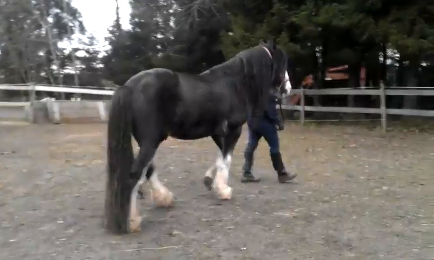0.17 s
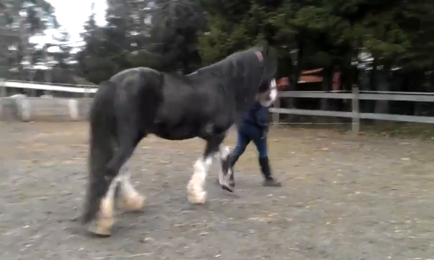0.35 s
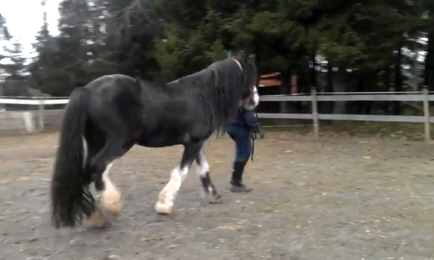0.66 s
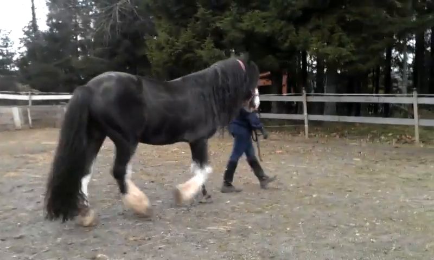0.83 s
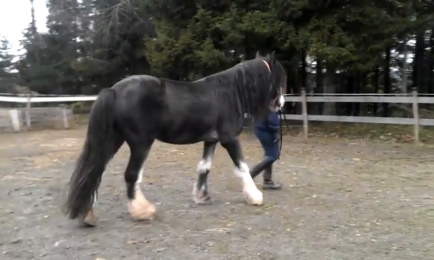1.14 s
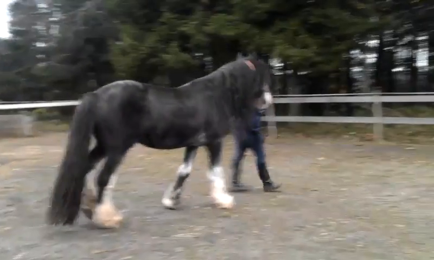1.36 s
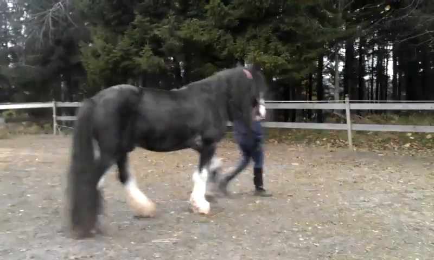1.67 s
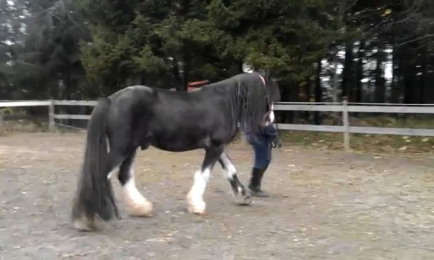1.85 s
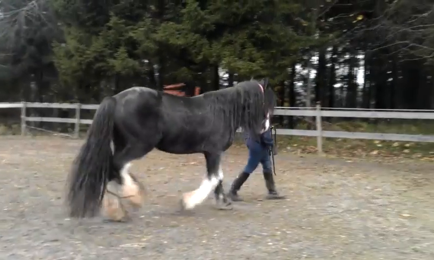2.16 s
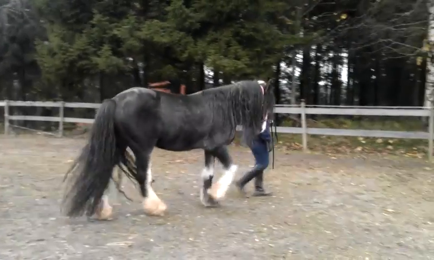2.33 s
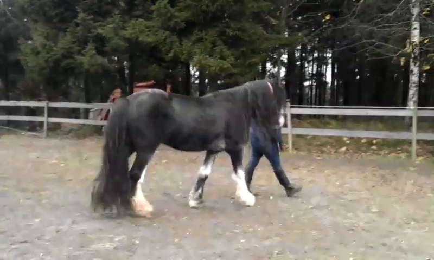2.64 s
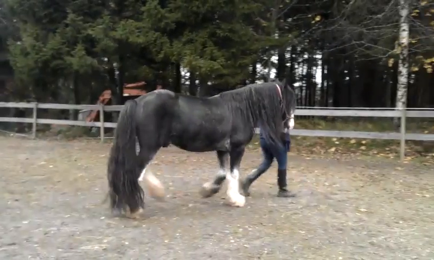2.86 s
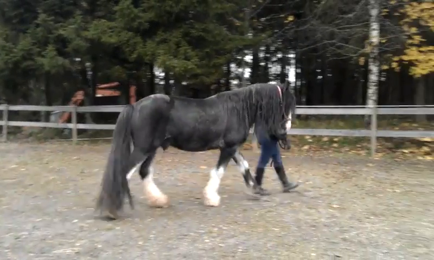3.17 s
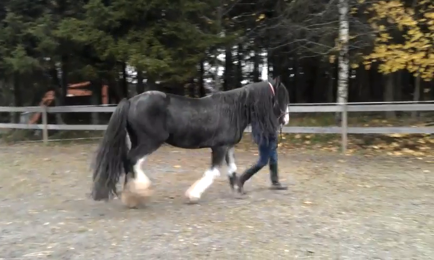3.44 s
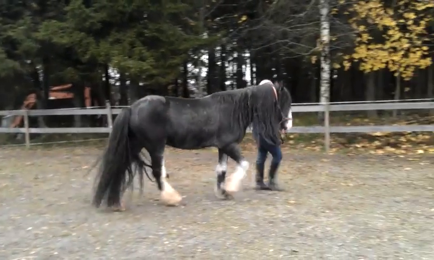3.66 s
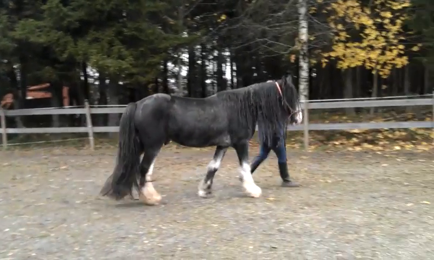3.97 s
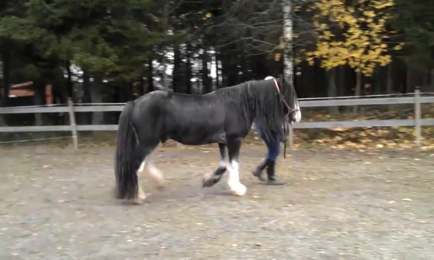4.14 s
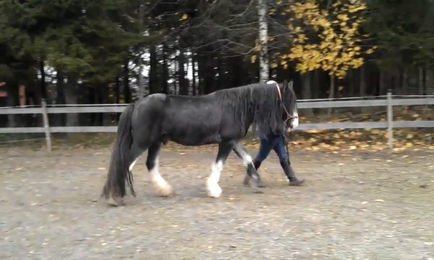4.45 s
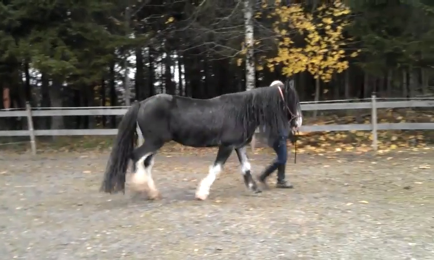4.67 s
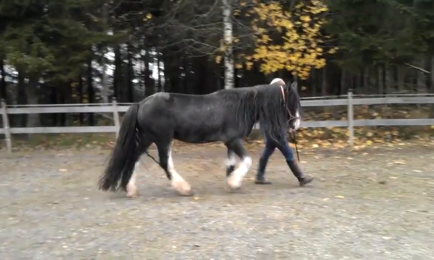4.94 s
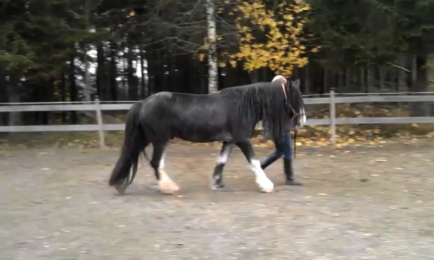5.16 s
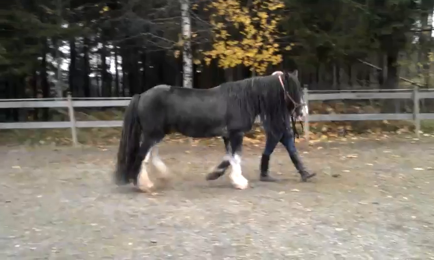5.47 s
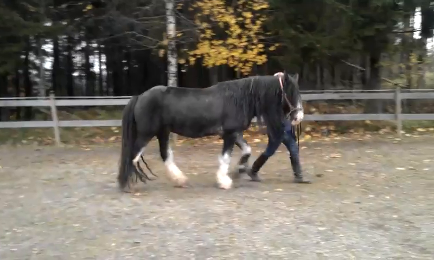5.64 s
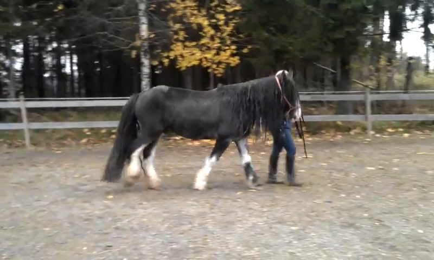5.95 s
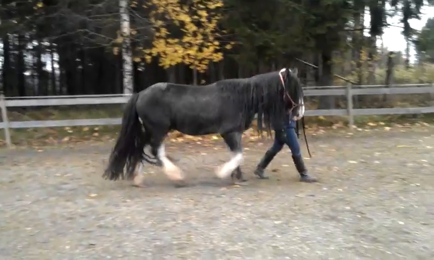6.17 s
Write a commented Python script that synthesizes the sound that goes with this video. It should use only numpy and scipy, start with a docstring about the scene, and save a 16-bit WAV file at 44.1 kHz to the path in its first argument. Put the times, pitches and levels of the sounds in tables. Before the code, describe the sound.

Boots scrape gravel close by, then a heavy horse walks past, hooves crunching with irregular boot steps and small stones snapping in a quiet outdoor paddock.

```python
"""At first a pair of boots scrapes twice over gravel close to the microphone, and single stones snap.
A heavy horse is led past at a walk: each hoof bites in heel first, then crushes the bed over a dull thud.
Boot steps and dragging toes grind between the hoof falls, with more snapping stones and a few dull knocks.
Gravel is made of thousands of tiny rings, pressed by each foot and coloured by grit, big stones and sand.
A faint outdoor hush of filtered noise and stray grains lies behind it all."""
import sys
import numpy as np
from scipy import signal
from scipy.fft import rfft, irfft, next_fast_len
from scipy.io import wavfile

SR = 44100
rng = np.random.default_rng(int(sys.argv[2]) if len(sys.argv) > 2 else 0)


def to_wav(sig):
    """Store sig (one row per channel, or 1-D mono) as 16-bit WAV at the path in sys.argv[1].

    Samples outside -1..1 are clipped; the rate is SR.
    """
    pcm = np.clip(np.atleast_2d(sig), -1, 1) * 32767
    pcm = np.round(pcm).astype(np.int16)
    wavfile.write(sys.argv[1], SR, pcm.T)  # frames by channels


N = 277866

# Hoof falls. Each row: touch in seconds, full weight in seconds, crush level in dB before colour and trim,
# heel level in dB re the crush before its bite, big stones in dB before the shared lift.
HOOF_FALLS = [ (0.194, 0.229, -19.5, -2.5, -2.5), (0.954, 0.98, -19.5, -11.5, -5.5),
              (1.221, 1.255, -24, -9.5, 4), (1.727, 1.779, -22.5, -7, -5.5),
              (1.973, 2.005, -28.5, -10, -4.5), (2.393, 2.418, -20.5, -10.5, -1.5),
              (2.615, 2.641, -30.5, -5.5, -4), (3.051, 3.098, -19.5, -11, -8.5),
              (3.325, 3.35, -29, -19, -6), (3.686, 3.721, -21, -15, -5), (3.907, 3.935, -25, -10, -3),
              (4.332, 4.381, -22.5, -14.5, -4), (5.021, 5.057, -22.5, -13, -5.5),
              (5.206, 5.232, -24, -15, -7.5), (5.665, 5.714, -23.5, -16, -0.5),
              (5.92, 5.939, -29, -26, -3.5)]


def hooves():
    """The heel bites in, the weight crushes the bed over a ground thud, and loose stones settle."""
    # the crush spreads longer when the hoof rolls slowly; a shape of 2 is a bell, less is more pointed
    crush_s, crush_per_roll, crush_shape = .006, .13, 1.61
    bite_db, settle_db, settle_decay_s = 3.5, -22, .078
    sand_db, damped_pitch, trim_db = -9, .92, .5
    # thud level is re the untrimmed crush, at the usual roll time; its swell starts this long before full weight
    thud_db, thud_hz, thud_lead_s = -40, 203, .041
    usual_roll_s, thud_db_per_halving = .035, 5.5

    out = np.zeros(N)
    run = grains(per_s=20000, spread_db=2.0, cluster_db=.2)
    t = np.arange(SR // 4) / SR
    touch = np.minimum(t / .004, 1)
    bite = np.exp(-t / .008)
    for start, load, db, heel_db, coarse_db in HOOF_FALLS:
        late = start + t - load
        roll_s = load - start
        crush = np.exp(-.5 * np.abs(late / (crush_s + crush_per_roll * roll_s)) ** crush_shape)
        # the heel hands over to the crush around full weight
        handover = np.sqrt(.5 - .5 * np.tanh(late / .008))
        heel = undb(heel_db + bite_db * bite) * handover
        settle = undb(settle_db) * np.exp(-np.abs(late) / settle_decay_s)
        force = touch * np.sqrt(crush ** 2 + heel ** 2 + settle ** 2)
        gravel = crunch(run, start, force, coarse_db, damped_pitch * stone_pitch(coarse_db), sand_db)
        add(out, start, undb(db + trim_db) * gravel)
        # a quicker roll onto the hoof thuds harder
        thud_level_db = db + thud_db + thud_db_per_halving * np.log2(usual_roll_s / roll_s)
        thud = thump(thud_hz, half_s=.012, steep_db=11)
        add(out, load - thud_lead_s, undb(thud_level_db) * thud)
    return out


# Boot steps and hoof drags. Each row: start in seconds, end in seconds, level halfway in dB before colour,
# swell from start to end in dB, big stones in dB before the shared lift.
STEPS_AND_DRAGS = [(0.907, 0.953, -44.5, 6, -3.5), (1.007, 1.093, -29, 2.5, -11),
                   (1.144, 1.216, -45, -5, -8), (1.28, 1.315, -40.5, -12, 5), (1.353, 1.46, -37, 1, .5),
                   (1.561, 1.705, -31.5, 1, -7.5), (1.838, 1.962, -45.5, -3.5, -10),
                   (2.124, 2.163, -27, 4, -7.5), (2.224, 2.295, -34, 4.5, -13.5),
                   (2.776, 2.896, -32, -5, -27), (3.22, 3.292, -37.5, -6.5, -12.5),
                   (3.386, 3.486, -32.5, 8, -6), (3.794, 3.831, -44, 4, -10), (3.974, 4.062, -32, -2, -6.5),
                   (4.41, 4.451, -42.5, 3, -2), (4.501, 4.57, -37, 6, -5.5), (4.599, 4.63, -34, 9.5, -12),
                   (4.748, 4.76, -36, 4.5, -10), (4.929, 4.975, -46.5, -6.5, 3.5),
                   (5.089, 5.188, -38, -12.5, -11), (5.556, 5.574, -38.5, 6.5, -13),
                   (5.632, 5.683, -32.5, 15.5, -3), (6.032, 6.074, -37.5, 12, -16),
                   (6.152, 6.201, -42, 13, -11), (6.212, 6.3, -30.5, -3.5, -4.5)]


def scuffs():
    """A sole rolls or a toe drags: fewer stones move, in uneven pushes, and trickle on a little."""
    rise_s, fall_s = .013, .019
    settle_db, settle_s = -20, .031
    out = np.zeros(N)
    run = rubbing(spread_db=2.5, cluster_db=.8, push_db=1.6, pebble_db=-18.5)
    for start, end, db, swell_db, coarse_db in STEPS_AND_DRAGS:
        first = max(start - 4 * rise_s, 0)
        t = first + np.arange(int((end - first + 4 * settle_s) * SR)) / SR
        progress = np.clip((t - start) / max(end - start, rise_s), 0, 1)
        rise = np.exp(-np.maximum(start - t, 0) / rise_s)
        after = np.maximum(t - end, 0)
        trickle = undb(settle_db) * np.exp(-after / settle_s)
        release = np.maximum(np.exp(-after / fall_s), trickle)
        force = rise * release * undb(db + swell_db * (progress - .5))
        add(out, first, crunch(run, first, force, coarse_db, stone_pitch(coarse_db), sand_db=-13))
    return out


# The two long scrapes of the near boots, a list of points for each. Each row: time in seconds,
# grit level in dB before colour, big stone level in dB before filter and lift.
NEAR_SCRAPES = [
    [(0.0, -26, -20), (0.032, -30, -17), (0.038, -27, -16), (0.08, -36, -22), (0.102, -29, -28),
     (0.132, -29, -30), (0.142, -31, -38), (0.152, -27.5, -42), (0.164, -41, -33), (0.19, -43, -39)],
    [(0.375, -37, -50), (0.403, -21.5, -24), (0.421, -34.5, -36.5), (0.473, -29.5, -59),
     (0.505, -24.5, -22.5), (0.639, -31.5, -24.5), (0.657, -31, -36.5), (0.703, -38, -39),
     (0.721, -31.5, -30.5), (0.759, -27, -34.5), (0.9, -53, -53)],
]
# What lies under the sole in each scrape. Each row: pitch of the big stones in Hz,
# fine sand in dB re the plain gravel colour at 8.5 kHz.
UNDER_SOLE = [(2400, -18), (1850, -12.5)]


def boots():
    """Close by, a sole slides over grit and grinds the big stones as the weight comes onto it."""
    big_lift_db, edge_s = 6, .015
    out = np.zeros(N)
    small = rubbing(spread_db=2.5, cluster_db=.7, push_db=1.1, pebble_db=-15.5)
    large = rubbing(spread_db=2.5, cluster_db=.7, push_db=1.1, pebble_db=-15.5)
    for scrape, (big_hz, sand_db) in zip(NEAR_SCRAPES, UNDER_SOLE):
        when, grit_db, big_db = np.transpose(scrape)
        first = max(when[0] - 4 * edge_s, 0)
        i = np.arange(int(first * SR), int((when[-1] + 4 * edge_s) * SR))
        t = i / SR
        # full contact during the scrape, soft edges outside it
        contact = np.exp(-np.abs(t - np.clip(t, when[0], when[-1])) / edge_s)
        grit = contact * undb(np.interp(t, when, grit_db))
        big = contact * undb(np.interp(t, when, big_db))
        add(out, first, crunch(small, first, grit, coarse_db=-4, coarse_hz=3300, sand_db=sand_db))
        ground = shape(large[i] * big, lambda hz: hump(hz, big_hz, steep_db=6.0))
        add(out, first, undb(big_lift_db) * ground)
    return out


# The loudest stones that snap under a foot. Each row: time in seconds, peak in dB before trim, pitch in Hz.
SNAPPING_STONES = [(0.0405, -5, 1800), (0.0473, -7, 2500), (0.0735, -9, 2450), (0.1512, -9, 3900),
                   (0.3564, -18, 2300), (0.3643, -13, 2550), (0.4771, -11, 5600), (0.5192, -8, 3300),
                   (0.7256, -13, 1400), (1.2562, -8, 2000), (1.5605, -14, 4600), (1.7169, -9, 4700),
                   (1.7367, -14, 4600), (2.2871, -16, 4700), (2.8889, -15, 5200), (4.21, -28, 1700),
                   (4.5485, -19, 1650), (5.047, -11, 5600), (5.678, -11, 1700), (6.2208, -10, 5800)]


def stones():
    """A pinched stone springs free: a ring of a cycle or two and a tiny spray of grit."""
    spray_db, trim_db = -9, -1
    out = np.zeros(N)
    t = np.arange(SR // 100) / SR
    colour = [(60, -65), (300, -30), (1200, 0), (6000, 0), (14000, -16)]  # (Hz, dB)
    for start, db, hz in SNAPPING_STONES:
        ring = np.sin(2 * np.pi * hz * t) * np.exp(-t * hz / 1.4)
        spray = undb(spray_db) * rng.standard_normal(len(t)) * np.exp(-t / .0006)
        # silence in front leaves room for the filter to spread
        padded = np.pad(ring + spray, (len(t), 0))
        snap = shape(padded, lambda f: curve(colour, f))
        add(out, start - len(t) / SR, undb(db + trim_db) * snap / np.abs(snap).max())
    return out


# Dull knocks of a sole or hoof on packed ground. Each row: time of the swell's top in seconds, level in dB,
# pitch in Hz, half length of the swell in seconds.
GROUND_KNOCKS = [(0.506, -35, 835, 0.0054), (0.546, -37, 610, .017), (0.628, -31.5, 1450, .012),
                 (2.096, -42, 630, .005), (2.412, -40, 766, .014), (3.432, -34.5, 1200, 0.0042),
                 (4.553, -33, 1220, .0048)]


def knocks():
    """Packed ground answers a firm step with a dull knock."""
    out = np.zeros(N)
    for when, db, hz, half_s in GROUND_KNOCKS:
        add(out, when - 3 * half_s, undb(db) * thump(hz, half_s, steep_db=7))
    return out


# Colour of the outdoor air. Each row: frequency in Hz, gain on white noise in dB.
AIR_COLOUR = [(30, -81), (80, -68), (120, -78), (180, -56), (280, -46), (600, -43), (1200, -43),
              (2500, -49), (5000, -48), (8700, -56), (12000, -61.5), (15500, -64)]


def hush():
    """Soft outdoor air as filtered noise, and the odd grain shifting under standing feet."""
    air = shape(rng.standard_normal(N), lambda hz: curve(AIR_COLOUR, hz))
    air = air * undb(.7 * walk(9))
    trickle = grains(per_s=500, spread_db=3.8, cluster_db=1.5) * undb(2 * walk(12))
    force = np.full(N, undb(-60))
    return air + crunch(trickle, 0, force, coarse_db=-2.0, coarse_hz=1760, sand_db=-12.0)


# Colour of crushed gravel. Each row: frequency in Hz, gain in dB.
GRAVEL_COLOUR = [(60, -58), (250, -32.5), (800, -13), (1500, -15.5), (2500, -0.5), (3400, -0.5), (4500, 8),
                 (5700, 7.5), (8700, 9), (10500, 4.5), (12500, 3), (15500, -8)]


def crunch(run, start_s, force, coarse_db, coarse_hz, sand_db):
    """Grains played by a foot's force; big stones add a broad ring in the middle, sand sets the top."""
    big_lift_db, ripple_db, ripple_step_hz = 1, 1.8, 170
    pressed = np.take(run, int(start_s * SR) + np.arange(len(force)), mode="wrap") * force
    ripple_points = ripple_db * rng.standard_normal(512)

    def colour(hz):
        """Grit and big stones together, with the ripple on top, in dB."""
        sand = curve([(5800, .0044), (8500, sand_db), (13000, 1.79 * sand_db)], hz)
        grit = curve(GRAVEL_COLOUR, hz) + sand
        big = curve(GRAVEL_COLOUR, 4500) + big_lift_db + coarse_db + hump(hz, coarse_hz, steep_db=7.5)
        # a random ripple colours each stretch of gravel, stronger towards the treble
        ripple = np.interp(hz / ripple_step_hz, np.arange(len(ripple_points)), ripple_points)
        ripple = ripple * np.sqrt(hz / 5000)
        return 20 * np.log10(np.hypot(undb(grit), undb(big))) + ripple
    return shape(pressed, colour)


def grains(per_s, spread_db, cluster_db):
    """Stones rubbing: a run of tiny rings, a few much louder than the rest, at rms 1."""
    ring_s, size = .00018, 64  # decay, length in samples
    when, pitch, loud, turn = rng.random((int(per_s * N / SR), 4)).T
    t = np.arange(size) / SR
    gain = undb(-spread_db * np.log(1 - .995 * loud))
    # the loudest grains are the biggest, and ring lower
    hz = pitch * SR / 2 * (1 - .6 * loud ** 20)
    tones = np.cos(2 * np.pi * (hz[:, None] * t + turn[:, None]))
    rings = gain[:, None] * np.exp(-t / ring_s) * tones
    place = (when * N).astype(int)[:, None] + np.arange(size)
    run = np.bincount(place.ravel(), rings.ravel(), N + size)[:N]
    # the bed gives way in small slips, so grains come in clusters
    return unit(run * undb(cluster_db * walk(200)))


def rubbing(spread_db, cluster_db, push_db, pebble_db):
    """Gravel under a sliding foot: fine grains in uneven pushes, and now and then a pebble that snaps."""
    fine = grains(9000, spread_db, cluster_db) * undb(push_db * walk(70))
    pebbles = grains(per_s=60, spread_db=3, cluster_db=0)
    return fine + undb(pebble_db) * pebbles


def stone_pitch(coarse_db):
    """Big stones ring higher, in Hz, the harder they are ground."""
    return 2360 * 2 ** (.05 * coarse_db)  # .05 octaves per dB


def thump(hz, half_s, steep_db):
    """A short swell of ground vibration around one pitch, loudest after three half lengths."""
    t = np.arange(int(6 * half_s * SR)) / SR
    swell = np.exp(-.5 * (t / half_s - 3) ** 2)
    shake = shape(rng.standard_normal(len(t)) * swell, lambda f: hump(f, hz, steep_db))
    return unit(shake) * np.sqrt(np.mean(swell ** 2))


def hump(hz, centre_hz, steep_db):
    """A broad resonance in dB, with straight skirts on a log-frequency axis."""
    return -steep_db * np.log2(np.cosh(2 * np.log2(hz / centre_hz)))


def walk(rate):
    """Chance drift through the whole scene: random points at a rate per second, joined by lines."""
    return np.interp(np.arange(N) * rate / SR, np.arange(N // 16), rng.standard_normal(N // 16))


def shape(x, db_at):
    """Filter by a function from Hz to dB."""
    size = next_fast_len(len(x) + 1024)
    hz = np.maximum(np.arange(size // 2 + 1) * SR / size, 1)
    return irfft(rfft(x, size) * undb(db_at(hz)), size)[:len(x)]


def curve(points, hz):
    """Read (Hz, dB) points on a log-frequency axis."""
    f, db = np.transpose(points)
    return np.interp(np.log(hz), np.log(f), db)


def undb(db):
    """Decibels to gain."""
    return 10 ** (np.asarray(db) / 20)


def unit(x):
    """Scale to rms 1."""
    return x / np.sqrt(np.mean(x ** 2) + 1e-18)


def add(out, start_s, x):
    """Mix a sound in at a time in seconds."""
    i = max(int(start_s * SR), 0)
    out[i:i + len(x)] += x[:max(N - i, 0)]


def scene():
    """Horse, boots and paddock at one microphone."""
    return (hooves() + scuffs() + boots() + stones() + knocks() + hush())[None]


# Dips of the microphone port. Each row: centre in Hz, width in Hz, gain in dB.
PORT_DIPS = [(2950, 144, -2.5), (7007, 748, -15)]


def record(dry):
    """The microphone port notches the treble; a steep low-pass cuts the very top."""
    def port(hz):
        """Sum of the bell-shaped dips, in dB."""
        return sum(db * np.exp(-((hz - f) / width) ** 2) for f, width, db in PORT_DIPS)
    coloured = shape(dry[0], port)
    low_pass = signal.ellip(10, .2, 70, 15850, fs=SR, output="sos")  # order, ripple dB, stop dB, edge Hz
    return signal.sosfilt(low_pass, coloured)[None]


dry = scene()
out = record(dry)
to_wav(out)
```